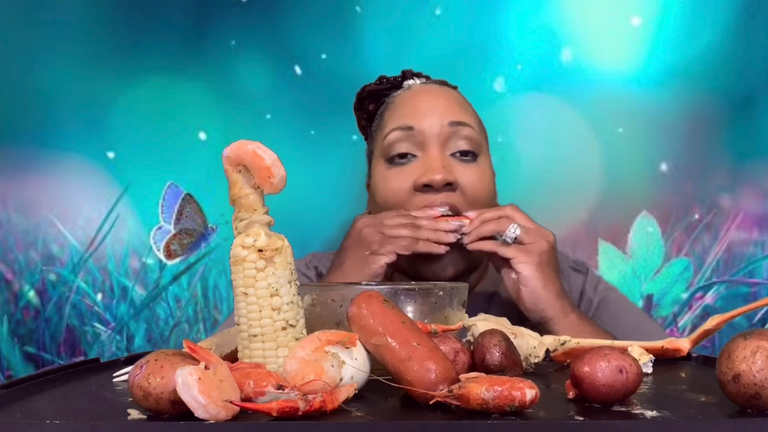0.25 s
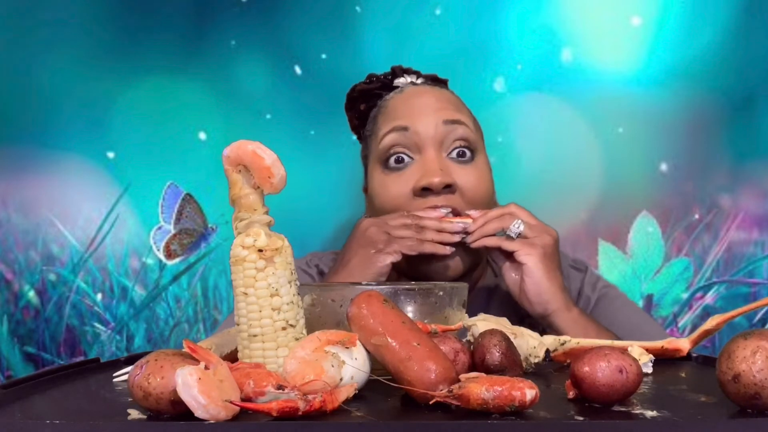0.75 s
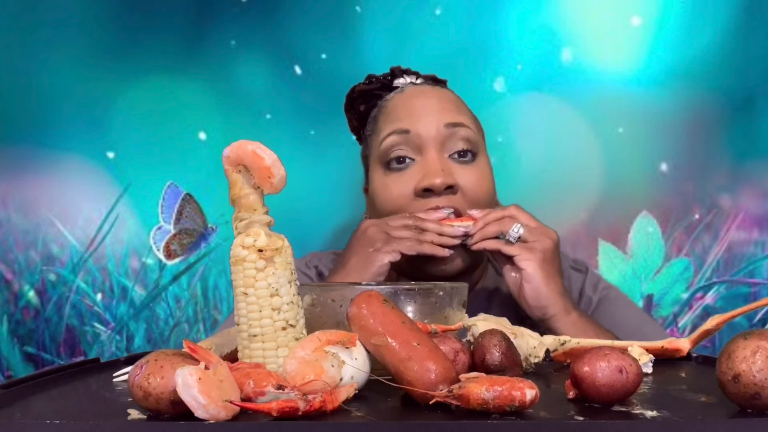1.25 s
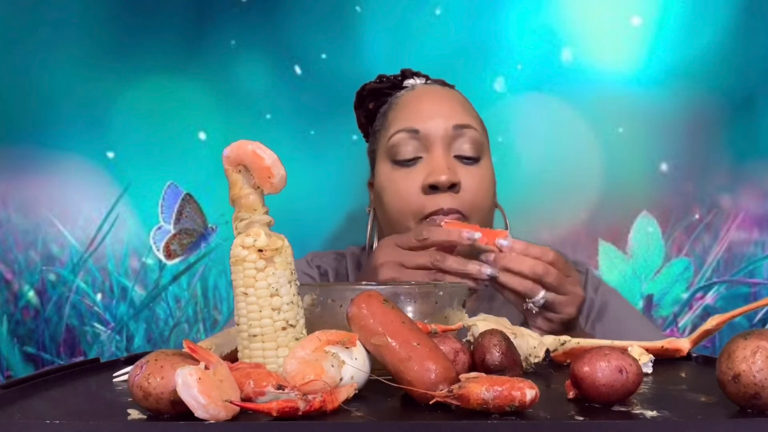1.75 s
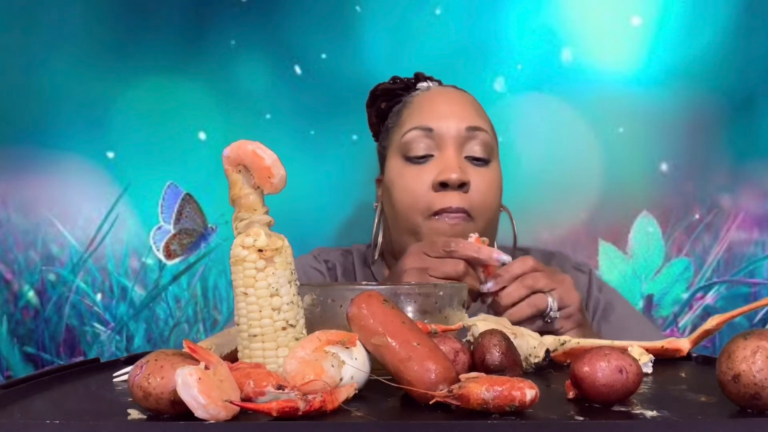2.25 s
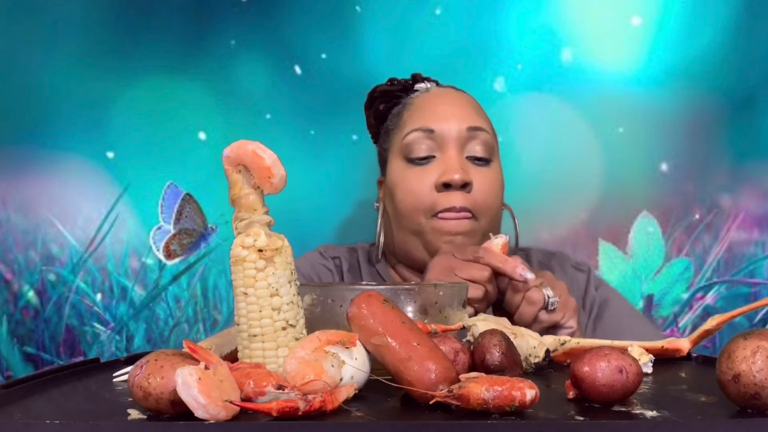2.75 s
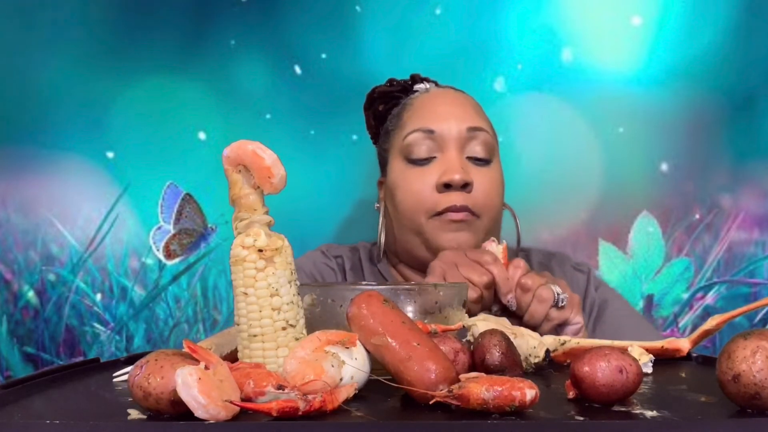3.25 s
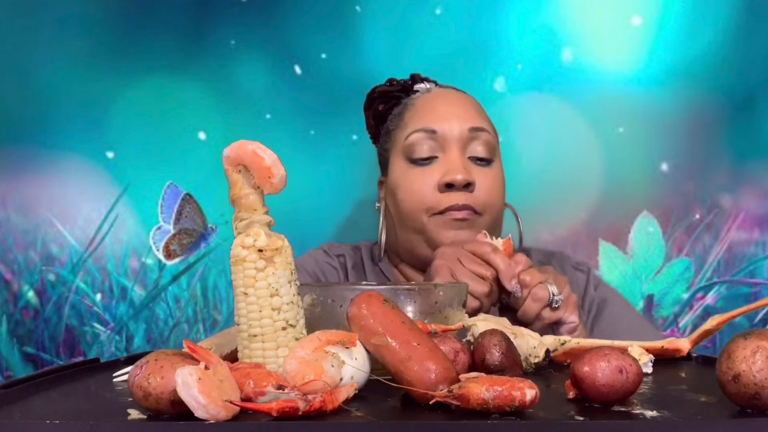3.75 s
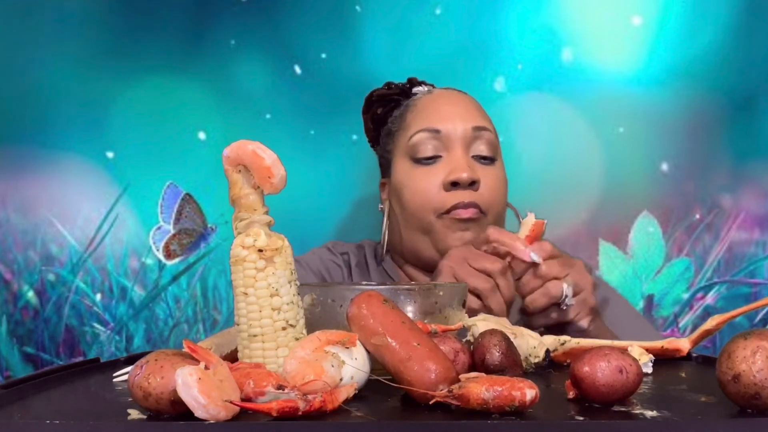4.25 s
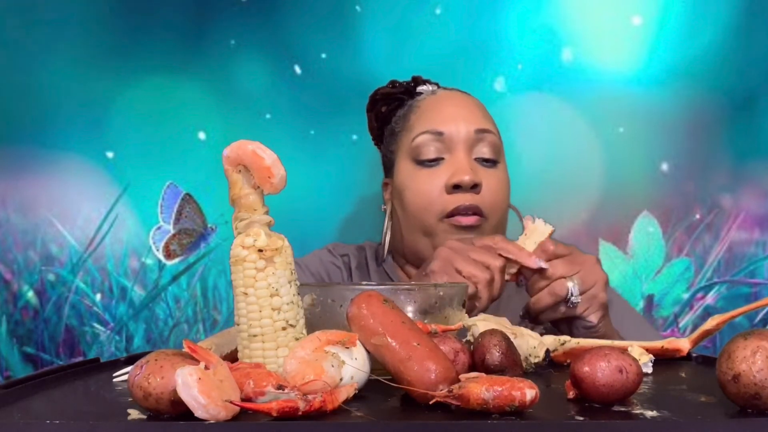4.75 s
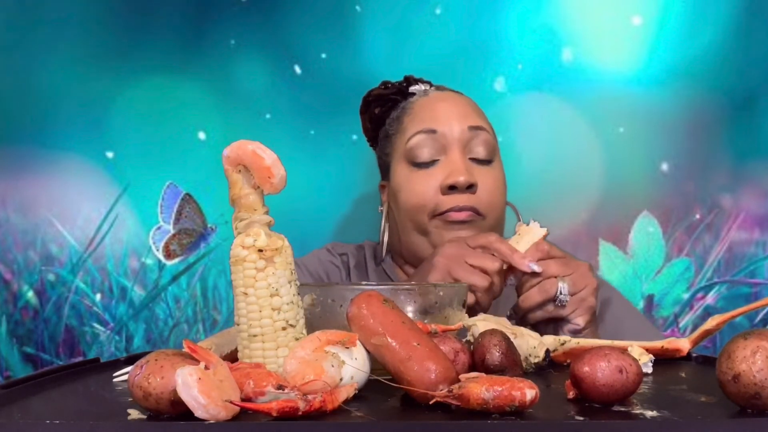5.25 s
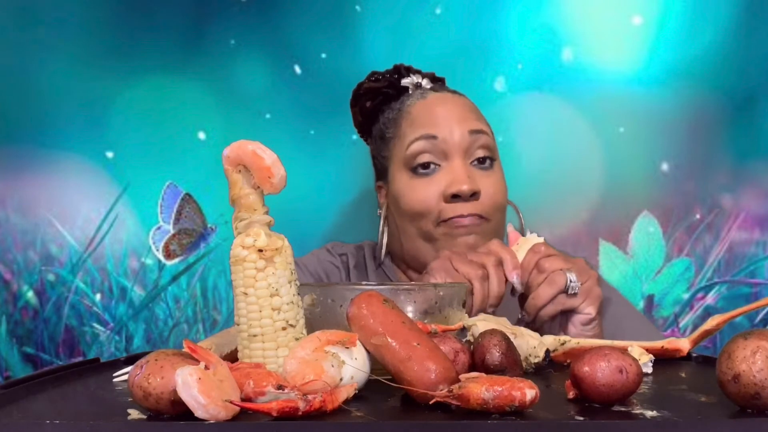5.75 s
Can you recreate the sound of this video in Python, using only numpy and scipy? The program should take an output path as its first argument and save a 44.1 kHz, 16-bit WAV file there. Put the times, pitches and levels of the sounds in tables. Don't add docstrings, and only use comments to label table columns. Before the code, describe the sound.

Very close to a stereo pair of microphones, teeth crack a crab leg in small dry ticks, then one loud bright break comes just before one second with a wet crunch. Fingers snap the shell, strongest around three and a half seconds, and nails pick the opened piece near five. A small room answers each crack over low ventilation rumble and faint hum.

```python
import sys
import numpy as np
from scipy import signal
from scipy.fft import rfft, irfft, next_fast_len
from scipy.io import wavfile

SR = 44100
rng = np.random.default_rng(int(sys.argv[2]) if len(sys.argv) > 2 else 0)


def voltage_ratio(level):
    return 10 ** (np.asarray(level, float) / 20)


def generate_wav(signal):
    frames = np.transpose(np.atleast_2d(signal))
    scaled = np.clip(frames, -1, 1) * 32767
    pcm = np.round(scaled).astype(np.int16)
    wavfile.write(sys.argv[1], SR, pcm)


N = 264600

# (frequency [Hz], level [dB per Hz])
AIR_SPECTRUM = [(12, -35), (20, -2.5), (53, 1), (123, -1), (459, -10), (574, -16), (1810, -32), (2320, -45),
                (3340, -38.5), (4540, -50.5), (7000, -47.5), (10000, -51), (13900, -55), (14700, -70),
                (16000, -85)]
# (frequency [Hz], left minus right [dB])
AIR_LEAN_LEFT = [(60, 0), (110, -0.5), (200, 1), (380, 0.5), (700, 6), (1290, 7), (2380, -3), (4400, 1.5),
                 (8120, 1.5), (15000, -2.5)]
# (frequency [Hz], likeness [-1 to 1])
CAPSULE_LIKENESS = [(60, 0.98), (130, 0.99), (290, 0.54), (640, 0.27), (1410, 0.33), (3100, -0.27),
                    (6820, -0.16), (15000, 0.45)]
# (time [s], level [dB])
DUCT_PRESSURE = [
    (0, -53),
    (1.08, -60.5),
    (1.6, -59),
    (3.0, -56),
    (3.4, -66),
    (3.9, -58),
    (5.1, -76),
    (6, -58),
]
# (frequency [Hz], width [Hz], level [dB])
HUM_TONES = [
    (58, 9, -59.5),
    (119.5, 8, -58.5),
    (432.3, 48, -66.5),
    (471.6, 10, -67.5),
    (1790, 10, -85),
    (3360, 110, -81.5),
    (3950, 111, -88),
]
# (time [s], peak [dB], tilt [dB per octave], focus [dB per octave squared])
TOOTH_CRACKS = [(0.0184, -57.5, 2, 2.5), (0.0672, -47.0, -1.5, -2), (0.2843, -69.5, -3.5, -1.0),
                (0.3107, -62, -6, 4), (0.3321, -63, -7.0, 6), (0.3696, -56, -7.5, 1),
                (0.4594, -53.5, -2.5, -2), (0.4644, -50.5, -9, -2), (0.816, -41, 0.5, 1),
                (1.0665, -51.5, 13, 6.5), (1.074, -48.5, -3, -1.0), (1.3129, -50, -4, -2),
                (1.3244, -49.5, -10, 3.5)]
# (frequency [Hz], level [dB], t60 [s])
MOUTH_MODES = [(520, -9, 0.005), (1350, -3, 0.0043), (1780, -5, 0.012), (2570, -1, 0.0036),
               (3600, -2.5, .009), (4380, -4.5, 0.0014), (5533, -3.5, 0.0043), (6612, -8.5, 0.0038),
               (7130, 3, 0.0022), (9600, -3, 0.0031), (10360, 6.5, 0.0011), (12300, 4.5, .002),
               (13700, -5.5, .002), (16090, -1, .002)]
# (time [s], length [s], level [dB], centre [Hz], width [Hz])
RUB_STROKES = [(0.285, .1, -72.5, 2407, 2400), (0.454, 0.013, -44, 970, 910), (.472, 0.039, -60, 1480, 398),
               (.82, 0.06, -62.5, 3460, 500), (0.884, .012, -40, 3000, 3000),
               (0.911, 0.051, -43, 4200, 4000), (0.914, 0.072, -40, 1450, 350),
               (1.069, 0.016, -56, 1700, 1500), (1.526, 0.029, -83, 5110, 2550),
               (1.712, 0.066, -74, 2500, 1303), (2.6, 0.45, -90, 10480, 1504),
               (2.675, .05, -81, 4760, 3100), (2.74, 0.14, -83, 3990, 1802),
               (3.054, 0.076, -83, 2412, 1204), (3.59, 0.045, -49, 4100, 4530),
               (3.92, 0.13, -76.5, 3000, 3510), (5.135, 0.074, -68, 4800, 3940),
               (5.379, 0.093, -86, 2268, 1800), (5.627, 0.27, -88.5, 3348, 2197),
               (5.958, 0.088, -76.5, 3704, 5832)]
# (time [s], peak [dB], tilt [dB per octave], focus [dB per octave squared])
LEG_CRACKS = [
    (0.8815, -42.5, 4, 4),
    (0.8959, -27.5, 10, 0.5),
    (0.8973, -17, 3.5, 8),
    (0.8975, -20.0, -5, 4),
    (0.904, -38, -5.0, 0.5),
    (1.2915, -63, -4.5, 4.0),
]
# (frequency [Hz], level [dB], t60 [s])
LEG_MODES = [(484, -26.5, .012), (693, -11, 0.011), (953.5, -21.5, 0.015), (1330, -6.5, 0.022),
             (1397, -1, 0.0092), (1870, -2.5, 0.009), (2550, 0, 0.0037), (3140, -11.5, 0.0054),
             (3790, -10, 0.0043), (4600, -11.5, 0.0014), (5500, -11.5, .004), (5830, -11.5, 0.001),
             (7820, 1, 0.0037), (8950, -4, 0.0048), (10050, -1, 0.0024), (11300, -4, 0.00092),
             (11660, -6, .002), (13780, -6.5, 0.0028), (15300, -4.5, 0.0019)]
# (time [s], peak [dB], tilt [dB per octave], focus [dB per octave squared])
FINGER_SNAPS = [(1.5369, -67, 8, 14), (1.7942, -60, -4.5, 1), (2.0632, -70, -2, 6.0), (2.0712, -61, 0, 3.5),
                (2.6754, -71, 0, 2), (3.045, -74.5, -10, 0.5), (3.3385, -40.5, 3.5, -1.5),
                (3.3497, -37.5, 2.5, -1), (3.357, -37.5, -9, 16.5), (3.4438, -62, 0.0, -0.5),
                (3.5176, -55.5, 1.5, 3), (3.5987, -32.5, 4, 1.5), (3.8897, -72, -6, 21),
                (4.4064, -91, 2, -8.0)]
# (frequency [Hz], level [dB], t60 [s])
HAND_MODES = [(830, -3.5, 0.0033), (1260, -15, 0.0097), (1915, -14, 0.036), (2430, 2.5, 0.0048),
              (3000, -5, 0.0088), (3650, -6.5, 0.0015), (4270, -6, 0.01), (5910, -7, 0.0038),
              (6060, 3, 0.0022), (7360, -5.5, 0.0058), (10040, -19, 0.0011), (9700, 1, 0.0019),
              (11300, 6.5, 0.00067), (11800, -7, 0.0032), (15140, -5, 0.0085), (14800, -12, 0.0087)]
# (time [s], peak [dB], tilt [dB per octave], focus [dB per octave squared])
NAIL_PICKS = [
    (4.8559, -64.5, -9, 6.5),
    (4.9034, -45, -4, 9.5),
    (4.9869, -45.5, -4.5, 7),
    (5.134, -35, -3.5, 10),
    (5.3863, -74, -5, 1),
    (5.618, -77, 0, 2.5),
    (5.8972, -67, -9.5, 3),
]
# (frequency [Hz], level [dB], t60 [s])
OPENED_MODES = [(1110, 0, 0.0051), (1939, -2.5, 0.0051), (2500, 4, 0.0044), (3250, -4, 0.0053),
                (4400, -8.5, 0.0078), (5620, -3, 0.0036), (6200, -9, 0.00096), (8340, -1.5, 0.005),
                (9900, 9, 0.002), (13100, 7, .002), (15500, -8, .002)]
# (delay [s], level [dB])
EARLY_ECHOES = [
    (.0035, -4),
    (.008, -11.5),
    (0.014, -14),
]
# (frequency [Hz], t60 [s])
ROOM_DECAY = [(300, 0.64), (1400, 0.36), (2500, 0.34), (4000, 0.34), (8000, 0.3), (16000, 0.23)]
# (frequency [Hz], level [dB])
ROOM_COLOUR = [(300, -15.5), (1150, -17), (1450, -10.5), (1800, -14), (2500, -7), (4000, -10.5),
               (6000, -10), (8000, -11.5), (16000, -17.5)]

AIR_FLOOR_DB, AIR_FOLLOWS = -52.5, 0.05
PIVOT_HZ, REACH_OCTAVES = 4000, 1.55
JOIN_HZ, LEFT_LAG_SAMPLES = 6900, 16.64


def at_hz(points, hz):
    table = np.array(points)
    return np.interp(np.log(hz), np.log(table[:, 0]), table[:, 1])


def rms_one(x):
    return x / np.sqrt(np.mean(x ** 2) + 1e-20)


def bandpass(x, low_hz, high_hz):
    return signal.sosfilt(signal.butter(2, [low_hz, high_hz], "band", fs=SR, output="sos"), x)


def ring(clicks, hz, t60):
    radius = voltage_ratio(-60 / (t60 * SR))
    angle = 2 * np.pi * hz / SR
    feedback = [1, -2 * radius * np.cos(angle), radius * radius]
    return signal.lfilter([0, np.sin(angle)], feedback, clicks + 1e-18)


def pair(hz, shape):
    settle = SR // 4
    mid, side = shape(rng.standard_normal((2, N + settle)))[:, settle:]
    alike = np.clip(at_hz(CAPSULE_LIKENESS, hz), -1, 1)
    return np.sqrt(1 + alike) * mid + np.sqrt(1 - alike) * side * [[1], [-1]]


def ventilation():
    rumble_db = np.interp(np.arange(N) / SR, *np.transpose(DUCT_PRESSURE))
    hiss_db = AIR_FLOOR_DB + AIR_FOLLOWS * (rumble_db - rumble_db.mean())
    edges = 18 * 2 ** np.arange(0, 9.9, 0.4)
    rumble, hiss = 0, 0
    for low_hz, high_hz in zip(edges, edges[1:]):
        hz = np.sqrt(low_hz * high_hz)
        level_db = at_hz(AIR_SPECTRUM, hz) + at_hz(AIR_LEAN_LEFT, hz) * np.array([[0.5], [-0.5]])
        band = voltage_ratio(level_db) * pair(hz, lambda noise: bandpass(noise, low_hz, high_hz))
        if hz < 90:
            rumble = rumble + band
        else:
            hiss = hiss + band
    return voltage_ratio(rumble_db) * rms_one(rumble) + voltage_ratio(hiss_db) * rms_one(hiss)


def hums():
    out = 0
    for hz, width, db in HUM_TONES:
        tone = pair(hz, lambda noise: ring(noise, hz, 4.3 / width))
        out = out + voltage_ratio(db) * rms_one(tone)
    return out


def swell(modes, cycles, damping):
    hz, t60 = np.array(modes)[:, :1], np.array(modes)[:, 2:] / damping
    time = np.maximum(np.arange(SR // 25) / SR - cycles / hz, 0)
    decay = np.log(1000) * time / t60
    return decay * np.exp(1 - decay) * np.cos(2 * np.pi * hz * time)


def shell(events, modes, gain_db, tear_s, scatter_db, after, cycles):
    near = swell(modes, cycles, damping=1)
    around = swell(modes, 0, damping=2.2)
    mode_hz, mode_db = np.array(modes)[:, 0], np.array(modes)[:, 1]
    octave = np.clip(np.log2(mode_hz / PIVOT_HZ), -REACH_OCTAVES, REACH_OCTAVES)
    draws = rng.standard_normal((len(events), 4, len(modes)))
    slips = rng.random((len(events), 3))
    length = SR // 25
    out = np.zeros((2, N + SR))
    for (s, peak_db, tilt, focus), draw, slip in zip(events, draws, slips):
        strength = voltage_ratio(peak_db + gain_db + tilt * octave - focus * octave ** 2 + mode_db)
        scattered = strength * voltage_ratio(scatter_db * draw[3])
        for k in range(3):
            at = round((s + k * slip[k] * tear_s) * SR)
            out[0, at:at + length] += after ** k * (scattered * np.sign(draw[k])) @ near
        start = round(s * SR)
        out[1, start:start + length] += strength @ around
    no_bass = signal.butter(2, 400, "high", fs=SR, output="sos")
    return signal.sosfilt(no_bass, out[:, :N])


def bites():
    return shell(TOOTH_CRACKS, MOUTH_MODES, gain_db=1.0, tear_s=0.00049, scatter_db=-2.5, after=0.28, cycles=1.5)


def room(x):
    size = next_fast_len(N + SR)
    hz = np.maximum(np.arange(size // 2 + 1) * SR / size, 1)
    t60, spectrum = at_hz(ROOM_DECAY, hz), rfft(x, size)

    def delay(lag):
        return np.exp(-2j * np.pi * hz * lag)

    out = []
    for side in range(2):
        tail, early = 0, 0
        for lag in rng.uniform(0.009, 0.025, 10):
            loop = voltage_ratio(-60 * lag / t60) * delay(lag)
            tail = tail + rng.choice([-1, 1]) * loop / (1 - loop)
        for s, db in EARLY_ECHOES:
            early = early + voltage_ratio(db) * delay(s + rng.uniform(0, 0.00058))
        response = voltage_ratio(at_hz(ROOM_COLOUR, hz)) * (tail + voltage_ratio(16.0) * early)
        for lag in rng.uniform(0.0004, 0.0025, 3):
            turn = delay(lag)
            response = response * (turn - 0.42) / (1 - 0.421 * turn)
        out.append(irfft(spectrum * response, size)[:N])
    return np.array(out)


def rubs(grains_per_s):
    out, time = np.zeros(N), np.arange(N) / SR
    grains = rng.standard_normal(N) * (rng.random(N) < grains_per_s / SR)
    for s, length, db, hz, width in RUB_STROKES:
        stroke = np.sin(np.pi * np.clip((time - s) / length, 0, 1) ** 0.55)
        texture = bandpass(grains, max(hz - width / 2, 300), hz + width / 2)
        out += voltage_ratio(db) * stroke * rms_one(texture)
    return out


def leg_break():
    return shell(LEG_CRACKS, LEG_MODES, gain_db=4.0, tear_s=0.00018, scatter_db=1.5, after=0.06, cycles=0.99)


def snaps():
    return shell(FINGER_SNAPS, HAND_MODES, gain_db=3, tear_s=0.0005, scatter_db=-2.5, after=0.42, cycles=2.56)


def picks():
    return shell(NAIL_PICKS, OPENED_MODES, gain_db=-0.5, tear_s=0.00039, scatter_db=-0.7, after=0.57,
                 cycles=1.456)


def scene():
    near, around = bites() + rubs(grains_per_s=6000) + leg_break() + snaps() + picks()
    direct = near * voltage_ratio([[0.5], [-0.5]])
    return ventilation() + hums() + direct + room(around)


def joined_treble(pair_of):
    size = next_fast_len(N + 64)
    hz = np.arange(size // 2 + 1) * SR / size
    left, right = rfft(pair_of, size)
    joined = 1 / (1 + np.exp((JOIN_HZ - hz) / 150))
    late = right * np.exp(-2j * np.pi * hz * LEFT_LAG_SAMPLES / SR)
    return irfft(np.array([left * (1 - joined) + late * joined, right]), size)[:, :N]


def band_limit(x):
    return signal.sosfilt(signal.butter(12, 17340, fs=SR, output="sos"), x)


def record(dry):
    top_cut = signal.cheby2(10, 60, 17000, fs=SR, output="sos")
    mix = signal.sosfilt(top_cut, joined_treble(dry))
    return band_limit(mix)


dry = scene()
out = record(dry)
generate_wav(out)
```